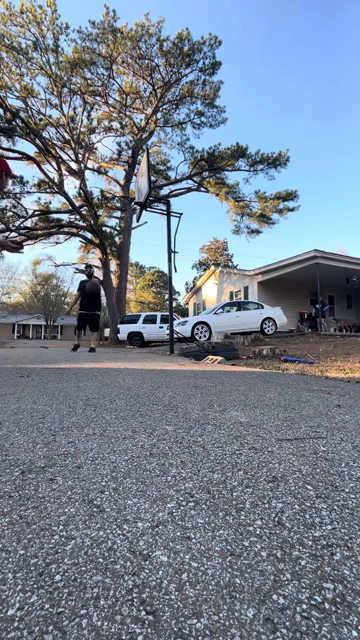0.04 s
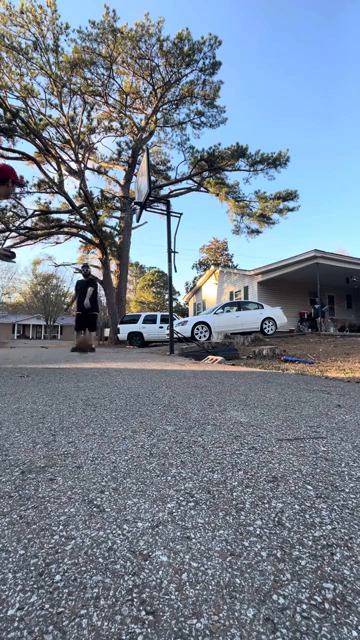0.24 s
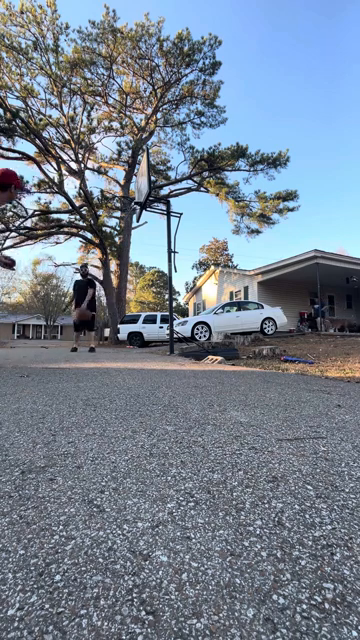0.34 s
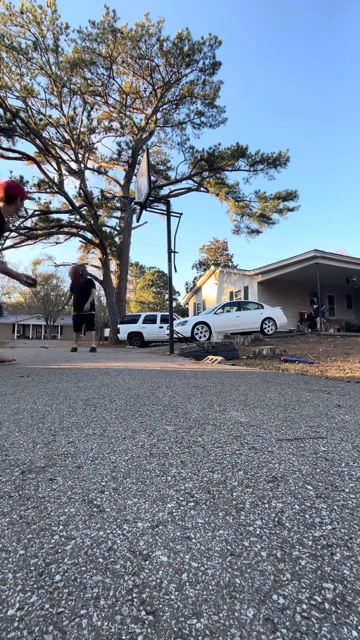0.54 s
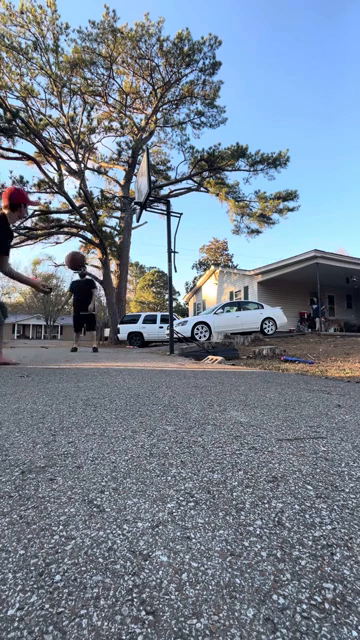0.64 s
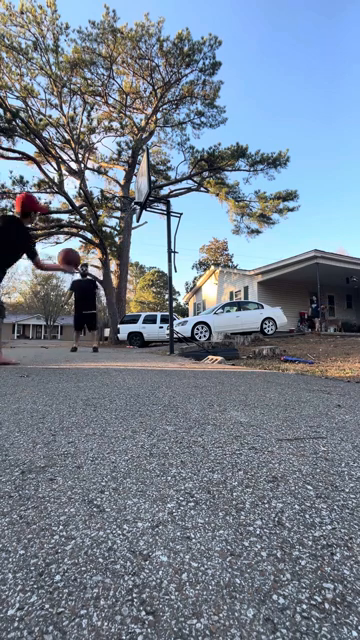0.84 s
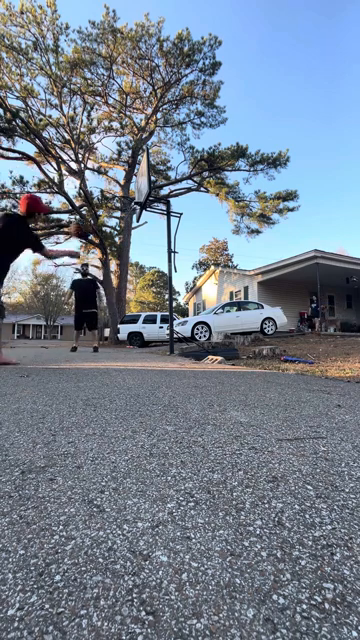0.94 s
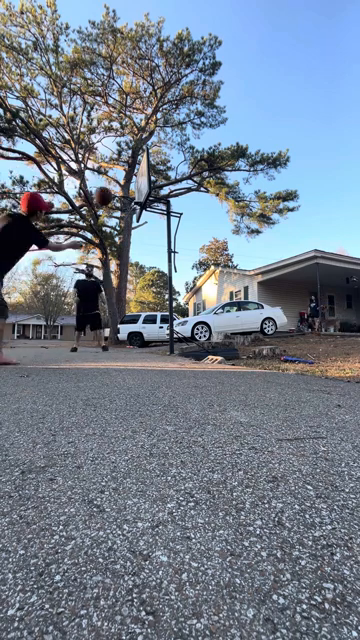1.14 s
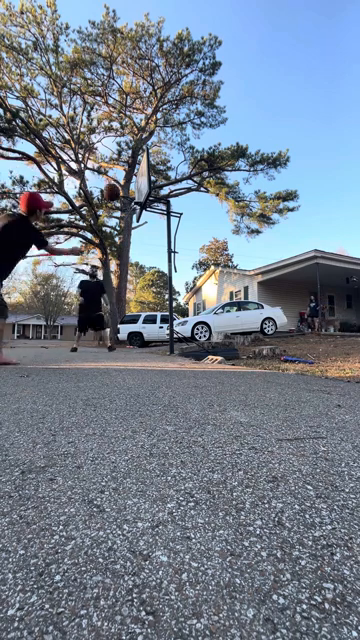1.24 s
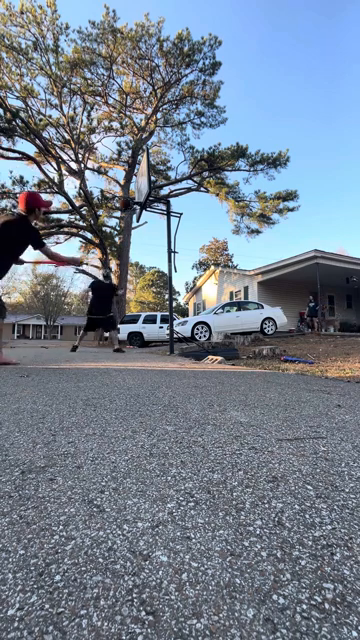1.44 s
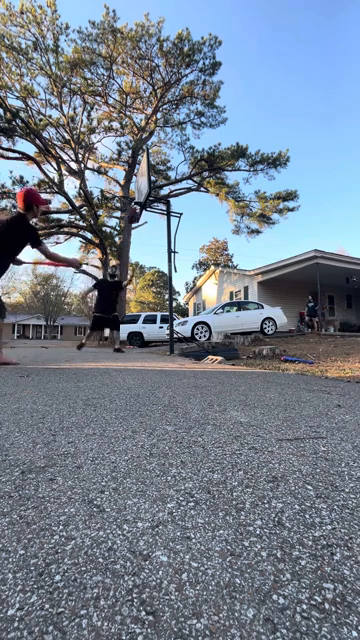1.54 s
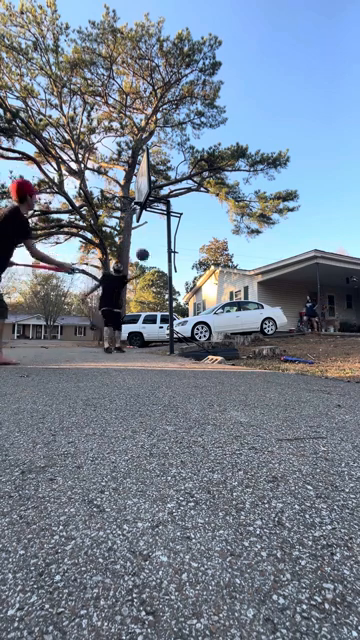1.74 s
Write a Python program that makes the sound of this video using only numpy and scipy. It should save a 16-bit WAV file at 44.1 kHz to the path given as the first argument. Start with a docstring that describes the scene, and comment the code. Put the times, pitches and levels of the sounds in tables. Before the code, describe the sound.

A basketball bounces on asphalt close to ground-level microphones at about 0.2 seconds, and again, softer, at 0.9. Each bounce is a ringing slap and low thump, with dull echoes off houses. Shoes drag and scuff quietly from 0.3 to 0.6 seconds. From 1.3 seconds the hoop net rattles faintly, with small ticks and a knock, fading by 1.8. Distant traffic and rustling leaves stay low throughout.

```python
"""Distant traffic rumbles and leaves rustle in a light wind; then a basketball is bounced twice close by.
The place is an asphalt driveway, with a pair of microphones lying on the ground. Each bounce is a short
slap that rings the ball, then a thump whose pitch falls away; houses send back dull echoes.
Shoes drag and scuff on the grit, and at the end the ball rattles through the net of the hoop.
Short ticks and knocks sound around the bounces and the net's rattle."""
import sys
import numpy as np
from scipy import signal
from scipy.fft import rfft, irfft
from scipy.io import wavfile

SR = 44100
rng = np.random.default_rng(int(sys.argv[2]) if len(sys.argv) > 2 else 0)


def digitize_waveform(pressure):
    """Quantize a signal to 16-bit integers and store it at the path in sys.argv[1].

    Rows of a 2-D input are taken as channels; values are limited to [-1, 1].
    """
    field = np.atleast_2d(pressure).T
    bounded = np.clip(field, -1, 1)
    quanta = np.round(bounded * 32767).astype(np.int16)
    wavfile.write(sys.argv[1], SR, quanta)


N = 79380


def amp(db):
    """Decibels to gain."""
    return 10 ** (np.asarray(db) / 20)


def unit_rms(x):
    """Scale to unit rms."""
    return x / np.sqrt(np.mean(x ** 2) + 1e-20)


def db_at(spectrum, hz):
    """Read a spectrum table on a log-frequency axis."""
    points_hz, points_db = np.transpose(spectrum)
    return np.interp(np.log(hz), np.log(points_hz), points_db)


def band(x, low_hz, high_hz):
    """Causal band-pass."""
    sos = signal.butter(2, [low_hz, min(high_hz, .45 * SR)], "band", fs=SR, output="sos")
    return signal.sosfilt(sos, x)


def drift(rate_hz):
    """Slow random wander, spread 1."""
    r = np.exp(-80 * np.pi * rate_hz / SR)
    slow = signal.lfilter([1], [1, -2 * r, r * r], rng.standard_normal(N // 40 + 2002))[2000:]
    return np.interp(np.arange(N) / 40, np.arange(len(slow)), unit_rms(slow))


def ring(x, hz, t60):
    """One mode: each click sets a dying sine ringing."""
    r, w = amp(-60 / (t60 * SR)), 2 * np.pi * hz / SR
    return signal.lfilter([0, np.sin(w)], [1, -2 * r * np.cos(w), r * r], x + 1e-18)


def place(out, sound, start_s, pan_db=0, lag_ms=0):
    """Send a sound to both microphones; the left is pan_db louder and lag_ms later."""
    for side, sign in enumerate((1, -1)):
        arrival = (start_s + sign * lag_ms / 2000) * SR
        i = int(arrival)
        delayed = np.convolve(sound, np.sinc(np.arange(-8, 9) - (arrival - i)))[8:][:N - i]
        out[side, i:i + len(delayed)] += amp(sign * pan_db / 2) * delayed


def rattle(curve, modes, clicks_per_s, width):
    """Dense uneven clicks ring a set of modes, under a level curve that is silent outside its ends."""
    times, levels = np.transpose(curve)
    clicks = (rng.random((3, N)) < clicks_per_s / SR) * rng.standard_normal((3, N))
    clicks = clicks[0] + width * clicks[1:]   # shared clicks plus each microphone's own
    rung = sum((-1) ** k * amp(db) * unit_rms(ring(clicks, hz, t60))
               for k, (hz, db, t60) in enumerate(modes))
    return unit_rms(rung) * amp(np.interp(np.arange(N) / SR, times, levels, left=-120, right=-120))


# Leaves in the wind, taken relative to the mean level: time_s, level_db
LEAF_RUSTLE = [(0.0, -71.5), (0.184, -67), (0.376, -77), (0.616, -79.5), (0.802, -67.5), (0.986, -64),
               (1.102, -65.5), (1.688, -88), (1.8, -109)]

def rustling_air(spectrum, flicker_db):
    """Coloured noise flickers in third-octave bands; the treble follows the leaves."""
    lead_in, rustle_from_hz = 8000, 6500
    out, size = 0, N + lead_in
    edges = 25 * 2 ** np.arange(0, 9.6, 1 / 3)
    colour = amp(db_at(spectrum, np.arange(1, size // 2 + 2) * SR / size))
    noise = irfft(rfft(rng.standard_normal((2, size))) * colour, size)
    times, levels = np.transpose(LEAF_RUSTLE)
    rustle_db = np.interp(np.arange(N) / SR, times, levels - levels.mean())
    for k, (low, high) in enumerate(zip(edges, edges[1:])):
        gain_db = flicker_db * drift(rate_hz=3.55) + rustle_db * (low > rustle_from_hz)
        out = out + amp(gain_db) * band(noise[k % 2], low, high)[lead_in:]
    return unit_rms(out)


# Ambience, alike (mid) and opposed (side) at the two microphones: frequency_hz, relative_db
AIR_MID = [(25, -9), (40, -23.5), (62, -2.5), (76, -3.5), (107, -1.5), (246, -5), (293, -19), (360, -12.5),
           (527, -24.5), (600, -24), (1200, -27.5), (2100, -36.5), (2850, -40), (3300, -42.5),
           (4000, -37.5), (4600, -32), (5000, -39), (5900, -79), (7000, -42.5), (8500, -50), (9500, -52),
           (10300, -107), (11500, -54.5), (13100, -49.5), (13700, -62), (14300, -75), (16500, -97)]
AIR_SIDE = [(40, -12), (60, -5.5), (250, -3.5), (300, 1), (350, -2.5), (430, -5.5), (1080, -8.5),
            (1850, -20.5), (2850, -16.5), (3500, -25.5), (4700, -16.5), (6500, -23.5), (8000, -44),
            (10000, -32), (11300, -45), (12600, -54), (14300, -38), (15500, -52), (16500, -72)]
# Far engines and a thin whine above them: pitch_hz, width_hz, level_db
DRONES = [(52.8, 2.7, -50.5), (115.5, 6.7, -51.5), (343, 13, -63), (2830, 57, -83)]

def traffic_and_wind():
    """A wide bed of distant noise and narrow drones, with the deepest rumble cut."""
    mid = amp(-48) * rustling_air(AIR_MID, flicker_db=1.0)
    for hz, width_hz, db in DRONES:
        drone = ring(rng.standard_normal(N + SR), hz, t60=2.2 / width_hz)[SR:]
        mid = mid + amp(db) * unit_rms(drone)
    side = amp(-55) * rustling_air(AIR_SIDE, flicker_db=0.5)
    low_cut = signal.butter(4, 51, "high", fs=SR, output="sos")
    return signal.sosfilt(low_cut, [mid + side, mid - side])


# Walls and cars around the driveway, nearest first: delay_s, relative_db, cutoff_hz, left_gain_db
ECHOES = [(0.013, -12, 1800, -3), (.023, -29.5, 1200, 6), (.045, -44, 1500, -12), (.070, -42, 1500, 11.5),
          (.103, -30.5, 1830, -1.5), (.165, -42, 1500, 2), (.19, -28.5, 498, -12), (0.259, -47.5, 1290, 11)]

def yard_echoes(slap, thump):
    """Hard surfaces return the slap, more smeared from farther off; slap and thump leave a dull tail."""
    t = np.arange(SR // 2) / SR
    reflections = np.zeros((2, len(t)))
    for delay_s, db, cutoff_hz, left_db in ECHOES:
        smear_s = .0007 + .05 * delay_s
        for side, side_db in enumerate((left_db, 0)):
            smear = rng.standard_normal(SR // 20) * np.exp(-t[:SR // 20] / smear_s)
            echo = band(smear / np.linalg.norm(smear), 170, cutoff_hz) * amp(db + 6.5 + side_db)
            reflections[side, int(delay_s * SR):][:len(echo)] += echo
    tail_rise_s, tail_t60_s = 0.037, 0.84
    envelope = amp(-50.5 - 60 * t / tail_t60_s) * np.minimum(t / tail_rise_s, 1)
    diffuse = rng.standard_normal((2, len(t))) * envelope
    tails = band(diffuse[0] + 0.14 * diffuse, 59, 4500)   # nearly alike at both microphones
    bounce = (amp(-8.5) * slap + thump).mean(0)
    early = np.array([signal.fftconvolve(slap.mean(0), wall)[:N] for wall in reflections])
    late = np.array([signal.fftconvolve(bounce, tail)[:N] for tail in tails])
    return early + late


GRIT_CLICKS_PER_S = 1800
# Ticks and knocks around the bounces and the net's rattle: start_s, peak_db, centre_hz, t60_s, pan_db
TICKS = [(0.234, -37.5, 2500, 0.018, -12), (0.856, -43.5, 3500, 0.017, 22), (0.885, -26, 500, 0.024, 2),
         (0.895, -35, 1060, 0.073, 2.5), (0.976, -56.5, 2320, 0.06, 20.5), (1.028, -63, 3780, 0.018, -21),
         (1.2645, -62, 3700, 0.0053, -7), (1.434, -38.5, 730, 0.026, -2), (1.436, -44.5, 1880, 0.0067, 6),
         (1.535, -54.5, 10000, .006, 5), (1.581, -56, 3470, 0.022, 12)]
# Shoes scuffing on grit: middle_s, length_s, level_db, centre_hz
SCUFFS = [(0.17, 0.052, -66.5, 2920), (0.614, 0.046, -57.5, 2110), (0.617, 0.061, -67, 4960)]

def ticks_and_scuffs():
    """Ticks and knocks are short dying puffs of noise; shoes scuff in swells of grit clicks."""
    def around(x, hz):
        return band(band(x, hz / 2, hz * 2), hz / 2, hz * 2)

    out, t = np.zeros((2, N)), np.arange(SR // 20) / SR
    for start_s, db, hz, t60, pan_db in TICKS:
        puff = around(rng.standard_normal(len(t)) * amp(-60 * t / t60), hz)
        place(out, amp(db) * puff / np.abs(puff).max(), start_s, pan_db, lag_ms=0.16)
    for middle_s, length_s, db, hz in SCUFFS:
        grit = (rng.random((2, N)) < GRIT_CLICKS_PER_S / SR) * rng.standard_normal((2, N))
        swell = np.exp(-((np.arange(N) / SR - middle_s) / (length_s / 2)) ** 2)
        out += amp(db) * unit_rms(around(grit, hz)) * swell
    return out


# A sole dragging between the bounces: time_s, level_db
DRAG_LEVEL = [(0.27, -53), (0.30, -69), (0.34, -61.5), (0.45, -62), (0.58, -65.5), (0.62, -75), (0.64, -80)]
# Resonances of the scrape: pitch_hz, relative_db, t60_s
DRAG_MODES = [(1700, -11, .004), (2890, -10.5, 0.018), (3364, -8, .006), (4550, -10, 0.004),
              (5760, -20, 0.015)]

def sole_drag():
    """A sole scrapes grit over the asphalt, spread wide across the microphones."""
    return rattle(DRAG_LEVEL, DRAG_MODES, GRIT_CLICKS_PER_S, width=1.0)


# How hard the net shakes, up above the microphones: time_s, level_db
NET_SHAKE = [(1.25, -98), (1.257, -62), (1.261, -74), (1.266, -48.5), (1.272, -57), (1.29, -56),
             (1.35, -52), (1.42, -56), (1.52, -60.5), (1.62, -69), (1.8, -87)]
# Resonances of the net: pitch_hz, relative_db, t60_s
NET_MODES = [(1140, -5, 0.014), (3320, -1.5, 0.022), (3350, -0.5, 0.1), (3480, -1.5, 0.015),
             (3950, -5.5, 0.0072), (4454, -2, 0.035), (4610, -2.5, 0.02), (4715, -4, 0.033),
             (5830, -7, 0.02), (6110, -10.5, 0.025)]

def hoop_net():
    """The ball drops through the net and shakes it into a bright rattle."""
    return rattle(NET_SHAKE, NET_MODES, clicks_per_s=3000, width=.4)


# The low thump of each bounce: start_s, gain_db, floor_hz, glide_cycles, knee_s, swell_s, fade_s
THUMPS = [(0.24321, .79, 15.09, 1.4605, .00241, .0171, .0213),
          (0.86529, -5.69, 36.91, .7307, .000137, .0301, .0293)]
# Accent on each thump's fast first cycles: level_db, decay_s
THUMP_ACCENTS = [(-43, 0.0024), (-21, 0.0021)]

def ball_thumps():
    """The push into the ground arrives as a swell of falling pitch: floor + glide / (time + knee)."""
    out, t = np.zeros((2, N)), np.arange(SR // 8) / SR
    for thump, (accent_db, accent_s) in zip(THUMPS, THUMP_ACCENTS):
        start_s, db, floor_hz, glide, knee_s, swell_s, fade_s = thump
        cycles = floor_hz * t + glide * np.log(1 + t / knee_s)
        swell = amp(db) * (1 - np.exp(-t / swell_s)) * np.exp(-(t / fade_s) ** 2)
        accent = amp(accent_db) * np.exp(-t / accent_s)
        place(out, (swell + accent) * np.sin(2 * np.pi * cycles), start_s, pan_db=-.6)
    return out


# The ball hitting the asphalt near the microphones:
# start_s, body_gain_db, body_cutoff_hz, crack_gain_db, crack_tilt_db_per_octave, body_pan_db
BOUNCES = [(0.2425, -2.5, 2900, -8, -2.5, 4), (0.8640, -13.5, 740, -10.5, 5.5, 1.5)]
# How late each crack reaches the left microphone: lag_ms
CRACK_LAGS = [-.11, .27]
# Resonances of the ball: pitch_hz, relative_db, t60_s
BALL_MODES = [(320, -13, 0.084), (756, 5, 0.015), (927, -5, 0.055), (1128, -7.5, 0.036), (1230, 8, 0.0083),
              (1296, 0, 0.021), (1770, 0.5, 0.026), (1850, -7.5, 0.012), (2040, -20, 0.0053),
              (2730, -13.5, 0.025), (3880, -13, 0.009), (4030, -7.5, 0.02)]
# Colour of the crack at contact: frequency_hz, relative_db
CRACK_SPECTRUM = [(1500, -27), (2100, 12.5), (2700, 9), (3400, -6), (4600, 7.5), (6000, -2), (7600, -4.5),
                  (10000, -24), (11300, -31), (13000, -21), (14500, -18), (16000, -23), (17000, -30)]

def ball_slaps():
    """The contact is a quick push into the ball's modes, with a bright crack of noise on top."""
    out, t = np.zeros((2, N)), np.arange(SR // 8) / SR
    contact_s, clicks_per_s = .0003, 12000
    crack_t60_s, tail_db, tail_t60_s = 0.0066, -26, 0.11
    crack_decay = amp(-60 * t / crack_t60_s) + amp(tail_db - 60 * t / tail_t60_s)
    edges = np.geomspace(1300, 17000, num=22)
    for (start_s, body_db, cutoff_hz, crack_db, tilt_db, pan_db), lag_ms in zip(BOUNCES, CRACK_LAGS):
        clicks = (rng.random(len(t)) < clicks_per_s / SR) * np.abs(rng.standard_normal(len(t)))
        push = clicks * t * np.exp(-t / contact_s)
        push /= np.linalg.norm(push)
        body = sum(amp(db - 13) * ring(push, hz, t60) for hz, db, t60 in BALL_MODES)
        body = signal.sosfilt(signal.butter(2, cutoff_hz, fs=SR, output="sos"), body)
        burst = rng.standard_normal(len(t)) * crack_decay
        crack = 0
        for low, high in zip(edges, edges[1:]):
            band_db = db_at(CRACK_SPECTRUM, np.sqrt(low * high)) + tilt_db * np.log2(low / 3000)
            crack = crack + amp(band_db) * band(burst, low, high)
        place(out, amp(body_db) * body, start_s, pan_db, lag_ms / 2)
        place(out, amp(crack_db) * crack, start_s, lag_ms=lag_ms)
    return out


def scene():
    """The driveway from ground level: ball, net, shoes, ticks, echoes and far traffic."""
    slap, thump = ball_slaps(), ball_thumps()
    return (slap + thump + hoop_net() + sole_drag() + yard_echoes(slap, thump)
            + ticks_and_scuffs() + traffic_and_wind())


def record(dry):
    """A steep low-pass takes the highest treble off both microphones."""
    stop_hz = 17400
    return signal.sosfilt(signal.cheby2(12, 70, stop_hz, fs=SR, output="sos"), dry)


dry = scene()
out = record(dry)
digitize_waveform(out)
```